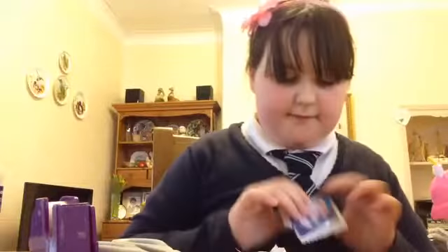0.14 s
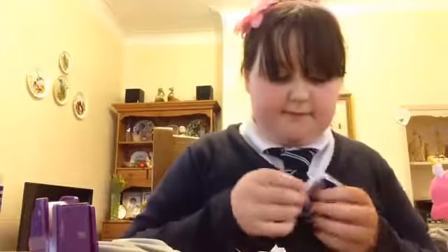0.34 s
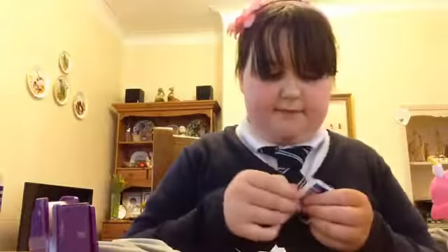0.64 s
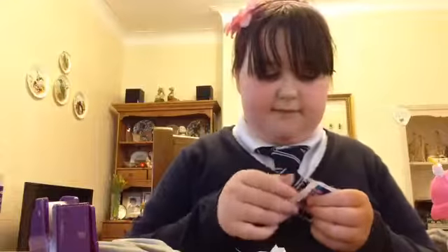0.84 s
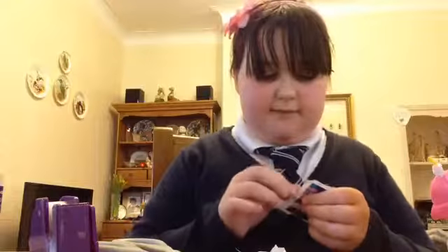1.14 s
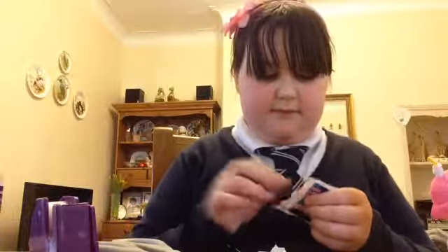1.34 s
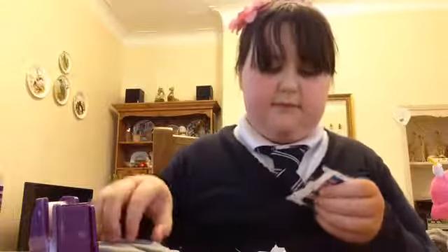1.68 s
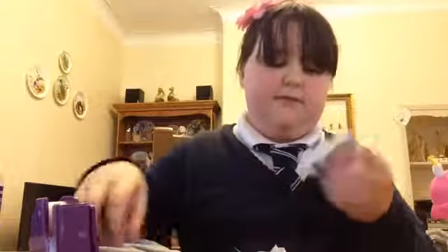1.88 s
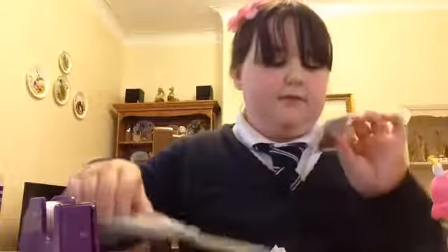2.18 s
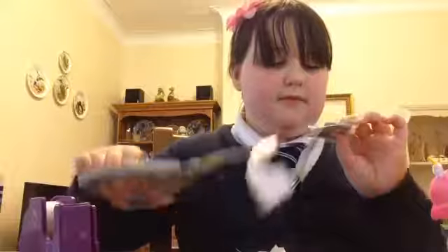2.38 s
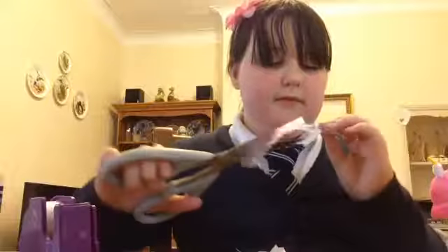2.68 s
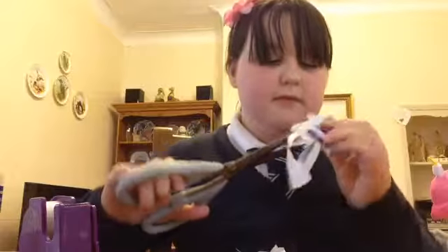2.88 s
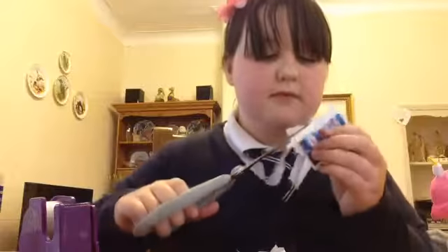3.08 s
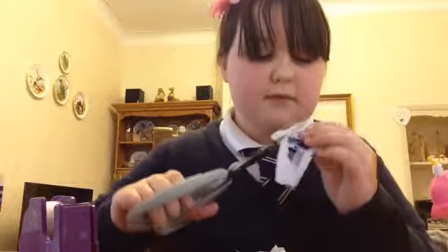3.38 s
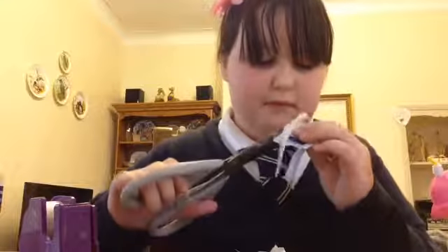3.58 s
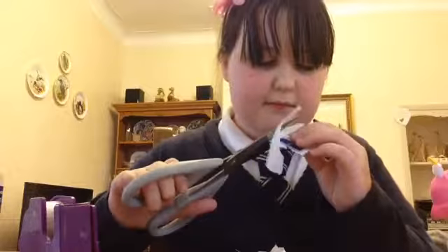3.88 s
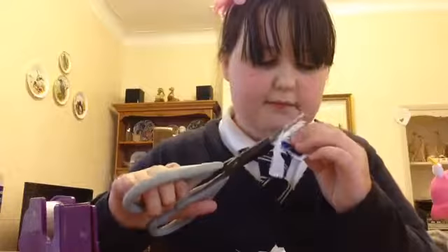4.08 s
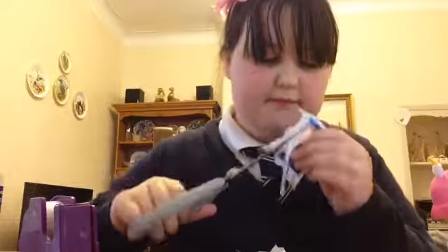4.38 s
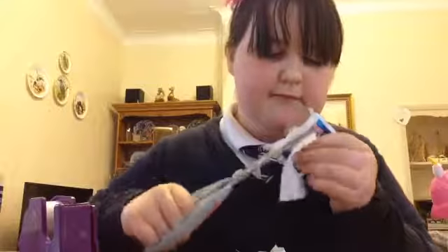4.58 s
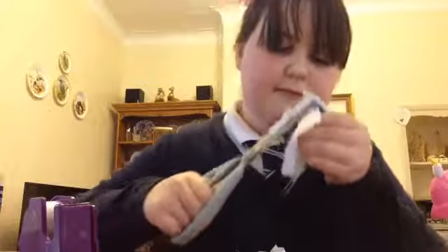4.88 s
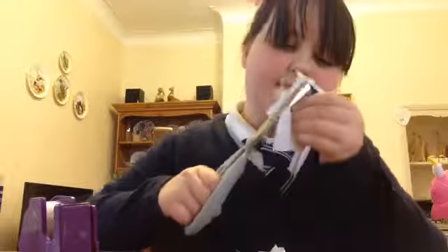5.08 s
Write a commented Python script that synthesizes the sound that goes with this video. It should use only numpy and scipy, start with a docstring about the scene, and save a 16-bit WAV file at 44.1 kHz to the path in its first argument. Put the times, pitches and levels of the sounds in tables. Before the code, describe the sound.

In a quiet room, close to a small microphone, fingers softly crinkle a taped packet for the first second, with a small pop near 0.5 seconds. From 1.6 to 2.1 seconds scissors clatter on a wooden table in two quick clusters of short knocks, loudest at 1.7 and 2.0 seconds, ending in a brief scrape. A faint steel squeak follows at 2.4 seconds. After a lull, the packet rustles very faintly around 3.7 seconds. From 4 seconds the blades creak quietly through cloth and tape, biting harder at 4.4 seconds, and the plastic handles clap shut loudly at 4.5 seconds with a soft thud. A couple of light clicks follow, then a last cut ends in a sharp, bright tick at 5.1 seconds. A faint fan hum and microphone hiss continue throughout.

```python
"""Scissors at a wooden table in a quiet room, close to a small microphone.
First fingers crinkle a taped packet. From 1.6 s the scissors knock on the table top, ringing its modes,
and drag briefly over it. After one more crinkle the blades creak through cloth and tape from 4 s;
the handles clap shut at 4.5 s and a last cut ends in a sharp tick at 5.1 s.
A fan hums over microphone hiss throughout."""
import sys
import numpy as np
from scipy import signal
from scipy.fft import rfft, irfft
from scipy.io import wavfile
from scipy.ndimage import uniform_filter1d

SR = 44100
rng = np.random.default_rng(int(sys.argv[2]) if len(sys.argv) > 2 else 0)


def dump(signal):
    """Clip the signal to [-1, 1] and save it as 16-bit WAV at the path in sys.argv[1]."""
    limited = np.clip(np.atleast_2d(signal).T, -1, 1)
    pcm = np.round(limited * 32767).astype(np.int16)
    wavfile.write(sys.argv[1], SR, pcm)


N = 230598
T = np.arange(N) / SR

# Blows on the table: t/s, level/dB, favoured f/Hz, relative crack level/dB
TABLE_KNOCKS = [(1.566, -42.5, 681.4, -17), (1.586, -27.5, 1310, -4.5), (1.599, -32, 513, -8.5),
                (1.614, -35.5, 480, -5), (1.675, -13.5, 1460, -3.5), (1.685, -29, 875, -5.5),
                (1.697, -30, 404, -42), (1.887, -45.5, 705, -9), (1.898, -37.5, 280, 0.5),
                (1.917, -39.5, 293, -18), (1.962, -19, 1410, -9.5), (1.978, -31, 1810, -11),
                (2.005, -36, 344, -24), (2.063, -38, 526, -13), (2.125, -40, 1210, -29.5)]
# Table-top modes: f/Hz, level/dB, t60/s
TABLE_MODES = [(178, -13, 0.055), (229, -9.5, 0.14), (295, -7, 0.18), (348.8, -5.5, 0.13),
               (475.7, -2, 0.057), (631, 3, 0.0392), (739, -3, 0.062), (925.5, -0.5, 0.057),
               (1123, 1, 0.06), (1268, -3.5, 0.025), (1363, 4, 0.024), (1582, -8, 0.077),
               (1650.5, -8, 0.11), (1743, -8.5, 0.041), (1830, -9.5, 0.072), (1940, -6.5, 0.068),
               (2210, 3.5, 0.0087), (2665, -10, 0.097), (3040, 2, 0.02317), (3415, -4, 0.034),
               (3700, -18.5, .02)]


def knocks():
    """The scissors strike the wooden top and ring its modes."""
    return blows(TABLE_KNOCKS, TABLE_MODES, crack_t60_s=0.0553, free_s=0.027, grip=0.69)


# Handle impacts: t/s, level/dB, favoured f/Hz, relative crack level/dB
HANDLE_CLAPS = [(4.488, -18, 490, -6), (4.505, -29, 270, -26)]
# Handle modes: f/Hz, level/dB, t60/s
HANDLE_MODES = [(228, -13, 0.068), (304, -4, 0.045), (481, -19.5, 0.063), (584, -17, 0.028),
                (740, -7.5, 0.028), (1108, -7.5, 0.063), (1355, -1, 0.036), (1557, -3, 0.033),
                (1725, -6, 0.053), (1805, -9.5, 0.028), (2630, -6, 0.018), (3010, -8.5, 0.02),
                (3446, 3, 0.019), (3945, -4.5, 0.02)]


def claps():
    """The plastic handles clap shut and ring briefly."""
    return blows(HANDLE_CLAPS, HANDLE_MODES, crack_t60_s=0.04, free_s=0.058, grip=0.64)


def blows(events, modes, crack_t60_s, free_s, grip):
    """Each struck spot favours nearby modes; a softer contact cracks less and cuts the treble."""
    spot_lift_db, spot_octaves = 9.5, 0.47
    scatter_db, detune = 1.5, 0.01
    hard_edge_hz, crack_db_per_octave, onset_cycles = 3700, 18, 3.84
    out, t = np.zeros(N), T[:SR // 4]
    hz, db, t60 = np.transpose(modes)[:, :, None]
    swell = 1 - np.exp(-t * hz / 0.54)  # modes build up in about a cycle
    hand_damping = 1 - grip / (1 + np.exp(-np.clip((t - free_s) / .003, -30, 30)))
    for start_s, level_db, spot_hz, crack_db in events:
        spot_db = spot_lift_db * np.exp(-(np.log2(hz / spot_hz) / spot_octaves) ** 2)
        gains = undb(db + spot_db + scatter_db * rng.standard_normal(hz.shape))
        pitch_hz = hz * (1 + detune * rng.standard_normal(hz.shape))
        phase = rng.uniform(0, 2 * np.pi, hz.shape)
        partials = gains * np.sin(2 * np.pi * pitch_hz * t + phase) * decay(t, t60) * swell
        ring = hand_damping * partials.sum(axis=0) / np.sqrt(np.sum(gains ** 2) / 2)
        crack = undb(crack_db) * cut(rng.standard_normal(len(t)), 1580, "high") * decay(t, crack_t60_s)
        edge_hz = hard_edge_hz * 2 ** (crack_db / crack_db_per_octave)
        onset = np.minimum(t * edge_hz / onset_cycles, 1)
        add(out, start_s, undb(level_db) * cut((ring + crack) * onset, edge_hz, "low"))
    return out


# Bites into cloth: peak t/s, rise t60/s, fall t60/s, blade level/dB, creak level/dB, edge level/dB
BITES = [(4.048, .03, 0.063, -81, -75, -74.5), (4.083, 0.018, 0.044, -77, -67, -74.5),
         (4.158, 0.047, 0.11, -77.5, -66.5, -76.5), (4.215, 0.15, .15, -76.5, -65.5, -76),
         (4.243, 0.053, 0.15, -72.5, -67, -80), (4.28, 0.042, 0.12, -74, -63.5, -76),
         (4.33, 0.046, 0.033, -66, -63.5, -72), (4.39, 0.021, 0.032, -46.5, -43.5, -48.5),
         (4.44, 0.28, 0.12, -65, -72, -68.5), (4.667, 0.015, .04, -73, -81, -67),
         (4.7, 0.8, 0.26, -71.5, -62, -79.5), (5.104, 0.041, 0.43, -53.5, -54, -62.5),
         (5.13, .01, 0.23, -49.5, -71.5, -54)]
# Resonances of blades, creaking handles and cutting edge: f/Hz, width/Hz, level/dB
BLADE_BANDS = [(3300, 1700, -9), (4650, 1200, 0.5), (6530, 580, -7), (7430, 740, -5)]
CREAK_BANDS = [(1004, 310, 6.5), (1610, 300, 0.5)]
EDGE_BANDS = [(9940, 2300, 6.5), (11900, 500, -11), (13200, 830, -0.5), (14400, 1000, -5)]


def shear():
    """Threads part one by one and ring the blades and their edge; the handles creak below."""
    creak = stick_slip(CREAK_BANDS, clicks_per_s=400, spread_db=1.1, rub=0.39)
    edge = stick_slip(EDGE_BANDS, clicks_per_s=1700, spread_db=2.5, rub=0.53)
    blades = stick_slip(BLADE_BANDS, clicks_per_s=1000, spread_db=7.4, rub=0.59)
    blade_gain, creak_gain, edge_gain = stroke_gains(BITES)
    return blade_gain * blades + creak_gain * creak + edge_gain * edge


# Snaps: t/s, level/dB, centre f/Hz, t60/s
SNAP_EVENTS = [(0.036, -62.5, 1460, 0.01), (.066, -66.5, 8000, .024), (0.375, -56, 750, 0.015),
               (0.465, -42.5, 1580, 0.013), (.699, -56, 1780, .03), (0.716, -53.5, 1680, 0.011),
               (1.047, -67, 1490, 0.013), (1.095, -72, 3000, .02), (1.109, -72, 3500, .015),
               (3.438, -65.5, 4700, .02), (4.665, -56, 4320, 0.027), (4.88, -56.5, 4520, 0.021),
               (5.104, -49, 1510, 0.013), (5.128, -32, 6400, 0.011), (5.143, -65, 3020, .008)]


def snaps():
    """Tape, film or thread lets go with a click and a broad puff of noise."""
    out = np.zeros(N)
    for start_s, db, hz, t60 in SNAP_EVENTS:
        add(out, start_s, undb(db) * burst(hz, octaves=0.94, rise_s=0.00027, t60_s=t60, click=0.98))
    return out


# Squeaks: t/s, level/dB, centre f/Hz, rise/s
STEEL_SQUEAKS = [(1.977, -51, 4600, .002), (2.379, -53.5, 1020, 0.0057), (2.406, -52.5, 1093, .016),
                 (4.301, -60.5, 4720, 0.022), (4.385, -53, 4530, 0.0019), (4.435, -55.5, 4700, 0.0056),
                 (5.131, -47.5, 1055, 0.0027)]


def squeaks():
    """Steel rubs on steel in brief narrow-band bursts."""
    out = np.zeros(N)
    for start_s, db, hz, rise_s in STEEL_SQUEAKS:
        add(out, start_s, undb(db) * burst(hz, octaves=0.12, rise_s=rise_s, t60_s=0.032, click=0))
    return out


# Resonances of steel on wood: f/Hz, width/Hz, level/dB
DRAG_BANDS = [(478, 880, 2.5), (1336, 270, 3), (2000, 640, 7), (3910, 140, -2.5), (4790, 310, -1),
              (7900, 9600, -8.5)]


def drag():
    """The scissors grip the wood, chatter over it and lift off."""
    start_s, end_s, level_db = 2.063, 2.12, -54.5
    grip = decay(np.maximum(start_s - T, 0), t60_s=0.014)
    lift = decay(np.maximum(T - end_s, 0), t60_s=0.11)
    chatter = stick_slip(DRAG_BANDS, clicks_per_s=1200, spread_db=5.0, rub=0.9)
    return undb(level_db) * grip * lift * chatter


# Packet squeezes: peak t/s, rise t60/s, fall t60/s, film level/dB, foil level/dB
SQUEEZES = [(.04, 0.078, 0.25, -64.5, -75), (.4, 0.11, 0.63, -69.5, -78), (.448, .006, 0.083, -60, -54),
            (.468, 0.054, 0.13, -57.5, -60), (.716, 0.13, 0.14, -58.5, -79), (3.7, 0.38, 0.21, -69, -87)]
# Film and foil resonances: f/Hz, width/Hz, level/dB
FILM_BANDS = [(964, 180, 15), (1460, 135, 15.5), (3330, 4300, 13.5)]
FOIL_BANDS = [(6200, 11400, 12.5), (10500, 500, 11.5), (13300, 2100, 10)]


def crinkle():
    """Folds of the packet pop: a papery middle and a thin bright top."""
    film = stick_slip(FILM_BANDS, clicks_per_s=710, spread_db=4.0, rub=0.5)
    foil = stick_slip(FOIL_BANDS, clicks_per_s=490, spread_db=3.7, rub=0.6)
    film_gain, foil_gain = stroke_gains(SQUEEZES)
    return film_gain * film + foil_gain * foil


# Thuds through the table: t/s, level/dB, centre f/Hz
TABLE_THUDS = [(.155, -65, 120), (.575, -62, 120), (1.59, -54, 147), (1.895, -54, 140), (1.97, -53, 157),
               (2.08, -56, 142), (4.49, -48, 135)]
# Neighbouring bending modes: f/centre f
BEND_RATIOS = [.93, 1.1]


def thuds():
    """A soft, slow push shakes the lowest bending modes of the table top."""
    length_s = 0.11
    out, t = np.zeros(N), T[:int(length_s * SR)]
    push = np.sin(np.pi * (t / length_s) ** .7) ** 2
    for start_s, db, hz in TABLE_THUDS:
        bends = sum(np.sin(2 * np.pi * (hz * ratio * t + rng.random())) for ratio in BEND_RATIOS)
        add(out, start_s, undb(db) * push * bends / np.sqrt(len(BEND_RATIOS)))
    return out


# Fan casing resonances: f/Hz, width/Hz, relative density/dB
CASING_BANDS = [(249, 49, -2.5), (443.5, 16.77, -3.5), (789, 110, -7), (1069, 160, -6.5), (1654, 92, -15.5)]
# Fan level drift: t/s, relative level/dB
FAN_DRIFT = [(0.0, 2.5), (5.23, -1)]


def fan():
    """Air noise excites the casing resonances, each wavering on its own."""
    level_db, waver_db = -70, 1.5
    hum = np.zeros(N)
    for hz, width_hz, db in CASING_BANDS:
        gain = undb(db + waver_db * wander(rate_hz=17)) * np.sqrt(width_hz)
        resonance = band(rng.standard_normal(N), hz, width_hz)
        hum += gain * unit_rms(band(resonance, hz, 2 * width_hz))
    return undb(level_db + np.interp(T, *np.transpose(FAN_DRIFT))) * unit_rms(hum)


# Noise floor spectrum: f/Hz, relative density/dB
HISS_SPECTRUM = [(35, -65), (60, -35), (253, -2), (343, -12.5), (584, -15), (1040, -11.5), (1480, -25),
                 (3180, -28), (13400, -29.5), (15400, -32.5)]


def hiss():
    """Steady broad noise of air and microphone, strongest in the low middle."""
    level_db = -70
    hz, db = np.transpose(HISS_SPECTRUM)
    bin_hz = np.fft.rfftfreq(N, 1 / SR) + 1
    colour = undb(np.interp(np.log(bin_hz), np.log(hz), db))
    return undb(level_db) * unit_rms(irfft(rfft(rng.standard_normal(N)) * colour, N))


# Reverberation bands: f/Hz, t60/s, level/dB
ROOM_BANDS = [(154.4, 0.54, -23), (420, 0.097, -11.5), (1030, 0.37, -19.5), (2550, 0.3184, -18.5),
              (5556, 0.13, -22.5), (11780, 0.079, -29)]


def room(x):
    """Dense echoes set in over a few milliseconds; the top treble dies first."""
    t, onset_s = T[:SR * 3 // 4], 0.0023
    tail = np.zeros(len(t))
    for hz, t60, db in ROOM_BANDS:
        echoes = unit_rms(band(rng.standard_normal(len(t)), hz, 1.24 * hz))
        tail += undb(db) * echoes * decay(t, t60) / np.sqrt(t60 * SR / 14)  # unit energy at 0 dB
    return x + signal.fftconvolve(x, tail * np.minimum(t / onset_s, 1))[:N]


def stick_slip(bands, clicks_per_s, spread_db, rub):
    """Each resonance gets its own uneven clicks over steady rubbing noise."""
    out = np.zeros(N)
    for hz, width_hz, db in bands:
        size = undb(spread_db * np.minimum(rng.exponential(size=N), 2.5))
        clicks = (rng.random(N) < clicks_per_s / SR) * size * np.sign(rng.standard_normal(N))
        force = unit_rms(clicks) + rub * rng.standard_normal(N)
        out += undb(db) * unit_rms(band(band(force, hz, width_hz), hz, 3 * width_hz))
    return unit_rms(out)


def stroke_gains(strokes):
    """One envelope per level column; each stroke rises and falls exponentially."""
    gains = 0
    for peak_s, rise_t60, fall_t60, *levels_db in strokes:
        shape = decay(np.abs(T - peak_s), np.where(T < peak_s, rise_t60, fall_t60))
        gains = gains + np.outer(undb(levels_db), shape)
    return gains


def burst(hz, octaves, rise_s, t60_s, click):
    """Band-passed puff of noise with an optional opening click."""
    t = T[:SR // 6]
    low_hz, high_hz = np.clip([hz * 2 ** (-octaves / 2), hz * 2 ** (octaves / 2)], 50, .45 * SR)
    colour = signal.butter(2, [low_hz, high_hz], "band", fs=SR, output="sos")
    push = rng.standard_normal(len(t)) * np.minimum(t / rise_s, decay(t - rise_s, t60_s))
    push[0] = click * np.sqrt(SR / hz)
    return signal.sosfilt(colour, push) * np.sqrt(SR / 2 / (high_hz - low_hz))


def wander(rate_hz):
    """Random steps, smoothed twice."""
    hold = int(SR / rate_hz)
    steps = np.repeat(rng.standard_normal(N // hold + 1), hold)
    return 1.3 * uniform_filter1d(uniform_filter1d(steps, hold), hold)[:N]


def band(x, hz, width_hz):
    """One resonance, gain 1 at the centre."""
    q = hz / min(width_hz, .4 * SR)
    return signal.lfilter(*signal.iirpeak(min(hz, .45 * SR), q, fs=SR), x)


def cut(x, hz, kind):
    """Third-order low- or high-pass."""
    return signal.sosfilt(signal.butter(3, hz, kind, fs=SR, output="sos"), x)


def undb(db):
    return 10 ** (np.asarray(db) / 20)


def unit_rms(x):
    return x / np.sqrt(np.mean(x ** 2))


def decay(t, t60_s):
    return np.exp(-np.log(1000) * t / t60_s)


def add(out, start_s, sound):
    i = int(start_s * SR)
    out[i:i + len(sound)] += sound[:N - i]


def scene():
    """Scissors and packet sound in the room, over fan and hiss; thuds arrive through the table."""
    handling = knocks() + claps() + snaps() + squeaks() + crinkle() + drag() + shear()
    return (room(handling) + thuds() + fan() + hiss())[None]


def record(dry):
    """The small microphone loses the deep bass and the top is cut."""
    low_hz, top_hz = 110, 15300
    top_cut = signal.ellip(10, .2, 60, top_hz, fs=SR, output="sos")
    return signal.sosfilt(top_cut, cut(dry, low_hz, "high"))


dry = scene()
out = record(dry)
dump(out)
```